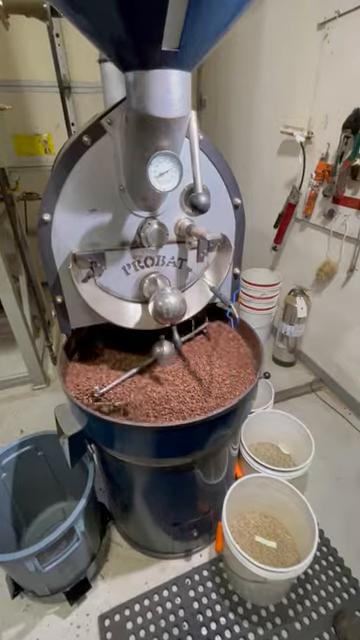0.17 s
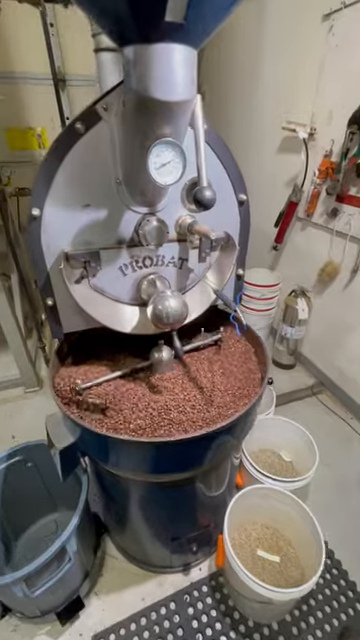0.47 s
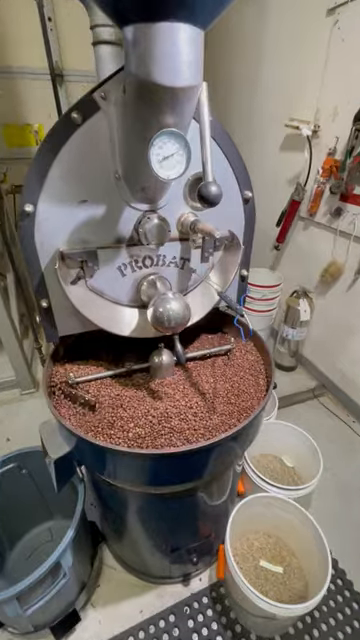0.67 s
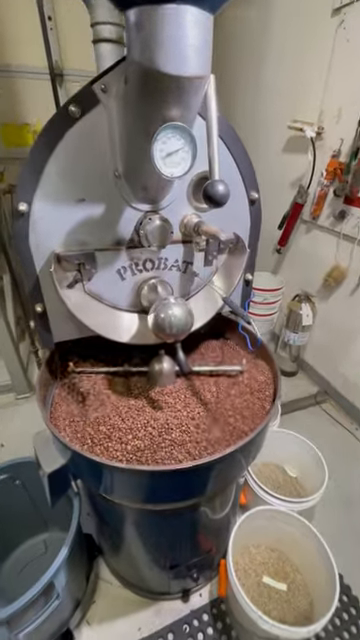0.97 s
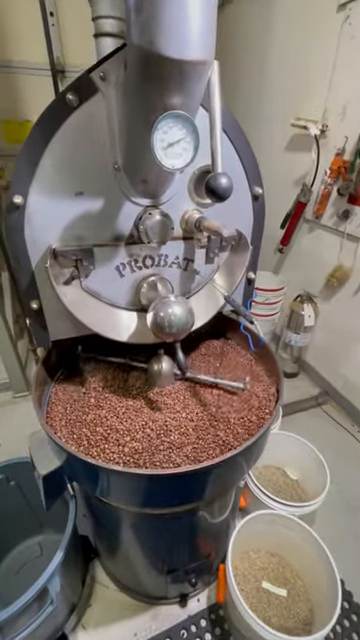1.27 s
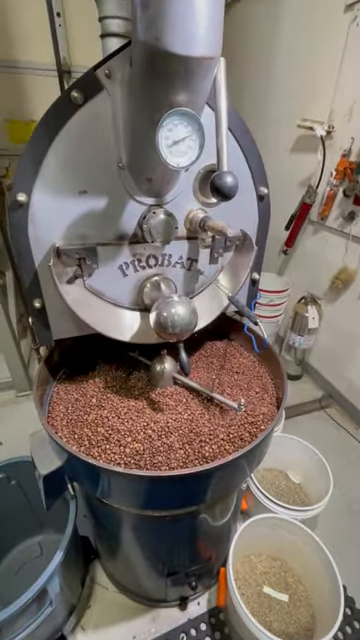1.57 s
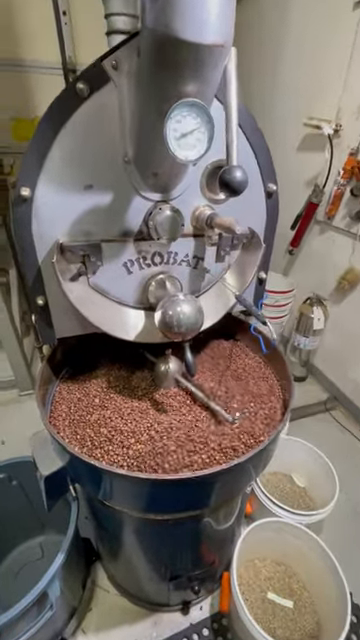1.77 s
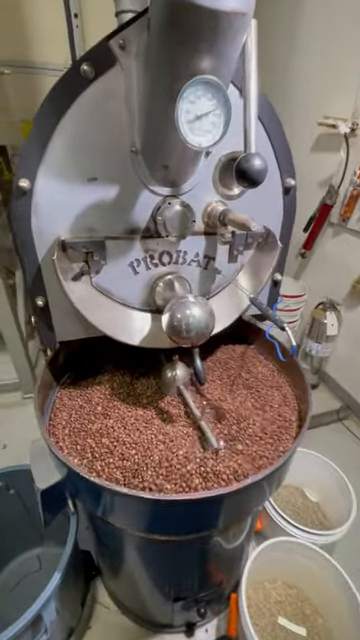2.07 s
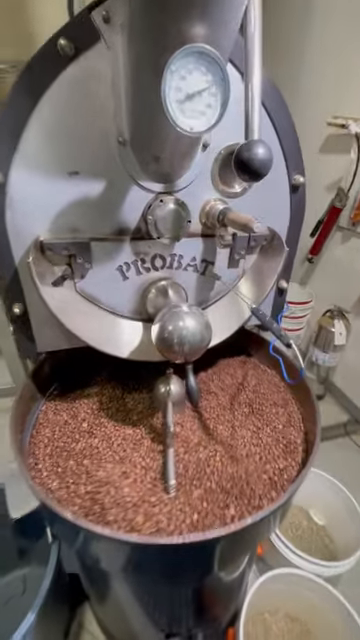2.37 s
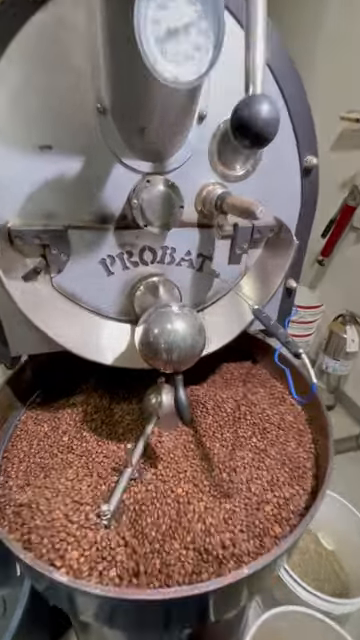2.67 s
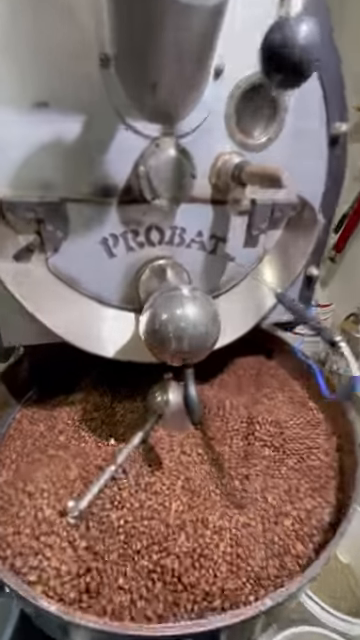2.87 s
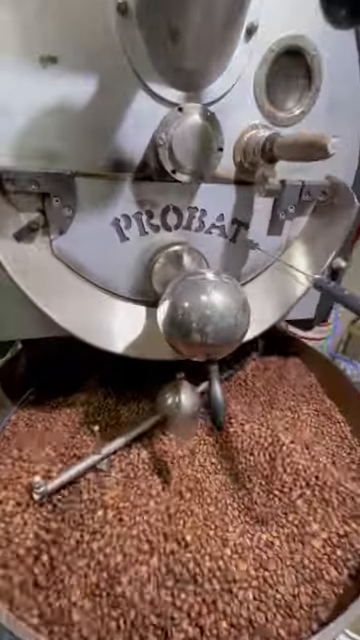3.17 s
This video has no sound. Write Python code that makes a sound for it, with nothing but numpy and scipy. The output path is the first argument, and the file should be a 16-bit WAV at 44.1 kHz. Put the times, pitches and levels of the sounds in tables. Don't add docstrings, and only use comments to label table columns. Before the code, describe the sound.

Steady low roar of a roasting machine with a faint motor whine, plus a thin, dense hiss of beans ploughed round a steel tray. It runs throughout, captured by a handheld phone in a workshop, with slightly rough treble.

```python
import sys
import numpy as np
from scipy import signal
from scipy.fft import rfft, irfft
from scipy.io import wavfile
from scipy.ndimage import uniform_filter1d

SR = 44100
rng = np.random.default_rng(int(sys.argv[2]) if len(sys.argv) > 2 else 0)


def output_pcm(signal):
    pcm = np.clip(np.atleast_2d(signal).T, -1, 1) * 32767
    wavfile.write(sys.argv[1], SR, np.round(pcm).astype(np.int16))


def volts_from_decibels(level):
    exponent = np.asarray(level, float) / 20
    return 10 ** exponent


N = 146412
SIZE = 147456
SPECTRUM_HZ = np.arange(SIZE // 2 + 1) * SR / SIZE
TIME_S = np.arange(N) / SR


def rms_one(x):
    return x / np.sqrt(np.mean(x ** 2) + 1e-20)


def back(spectra):
    return irfft(spectra, SIZE)[..., :N]


def in_time(rows):
    s, value = np.transpose(rows)
    return np.interp(TIME_S, s, value)


def at_hz(points, hz):
    p = np.array(points, float)
    return np.interp(np.log(hz + 1), np.log(p[:, 0] + 1), p[:, 1])


def drift(rate_hz):
    r = np.exp(-2 * np.pi * rate_hz * 40 / SR)
    noise = rng.standard_normal(N // 40 + 2002)
    slow = signal.lfilter([1], [1, -2 * r, r * r], noise)[2000:]
    return np.interp(np.arange(N) / 40, np.arange(len(slow)), rms_one(slow - slow.mean()))


# middle in seconds, half length in seconds, pitch in Hz, level in dB.
FLAME_SURGES = [(0.126, 0.089, 74, 6.5), (0.217, 0.16, 180, 10), (.4, 0.085, 115, 6.5),
                (.65, 0.22, 74.6, 7.5), (.62, 0.026, 108, 7.5), (.95, .12, 114, 4.5),
                (1.19, .12, 117, -8.5), (1.275, .08, 74, 6.5), (1.5, 0.11, 104, 8.5),
                (1.596, 0.039, 212, 3.5), (1.827, 0.15, 106, 4), (2.036, 0.057, 103, -15),
                (2.2, 0.24, 74.5, 0), (2.5, 0.48, 51, 6.5), (2.452, 0.25, 128, 2.5),
                (2.627, 0.027, 115, -18), (2.767, 0.057, 121, 3), (2.85, 0.076, 74, 4),
                (2.9, 0.18, 210, 5.5), (2.97, 0.088, 115, 5.5), (3.1, 0.16, 51, -12), (3.165, .07, 134, 4),
                (3.22, 0.036, 74, 6), (3.272, 0.063, 106, 7), (.04, .05, 201, -8), (0.085, .06, 834, 8),
                (0.296, 0.071, 232, -0.5), (.3, 0.082, 390, 3), (.52, 0.077, 760, 5), (.57, .05, 60, 13),
                (.6, 0.08, 150, -6), (0.878, 0.031, 111, 5), (1.152, 0.052, 360, 4.5), (1.3, 0.1, 541, -2),
                (1.352, 0.039, 135, -8), (1.694, 0.2, 820, -3), (1.9, .1, 140, -5), (1.94, 0.087, 403, 3.5),
                (2.082, .07, 560, 2), (2.21, .08, 1900, -7), (2.452, .08, 2300, 2), (2.69, 0.05, 222, 3.5),
                (2.8, .06, 303, -12), (2.946, 0.16, 950, 4), (3.05, 0.13, 1500, -5.5), (.85, .1, 3100, 3.5),
                (1.15, .06, 3500, 3), (1.294, 0.037, 3300, -7), (2.855, 0.037, 400, 4)]


def surge_db(hz, reach):
    t = np.arange(0, N + 64, 64) / SR
    total = 0
    for middle_s, half_s, surge_hz, db in FLAME_SURGES:
        total = total + db * np.exp(-(np.log(hz / surge_hz) / reach) ** 2 - ((t - middle_s) / half_s) ** 2)
    return np.interp(TIME_S, t, total)


# pitch in Hz, lead in radians.
MIC_LEAD = [(400, 0), (860, .5), (1810, .5), (2240, 1.7), (3800, 2.5), (4050, 6.7), (4900, 7.5),
            (7000, 7.4)]
# pitch in Hz, level in dB.
MIC_BALANCE = [(60, 0), (300, -.1), (550, .6), (1000, 2.2), (1400, 1.8), (2200, 2), (3000, .9), (5500, 1.4)]
# pitch in Hz, level in dB.
ROOM_DIFFUSE = [(110, -39), (250, -24), (550, -10), (1000, -5.5), (1800, -4.5), (2700, -1.8), (3700, -1.2),
                (4300, -3.4)]


def ports(direct):
    turn = volts_from_decibels(at_hz(MIC_BALANCE, SPECTRUM_HZ) / 2) * np.exp(.5j * at_hz(MIC_LEAD, SPECTRUM_HZ))
    share = volts_from_decibels(at_hz(ROOM_DIFFUSE, SPECTRUM_HZ))
    diffuse = rfft(rng.standard_normal(N), SIZE) * share * [[1], [-1]]
    both = rfft(rms_one(direct), SIZE) + diffuse
    return both * [turn, 1 / turn] / np.sqrt(1 + share ** 2)


def coloured(spectra, colour, patchy_db, shared_db):
    place = 2 * np.log2((SPECTRUM_HZ + 1) / 20)
    low_hz, high_hz = colour[0][0], colour[-1][0]
    shaped = spectra * volts_from_decibels(at_hz(colour, SPECTRUM_HZ)) * (SPECTRUM_HZ > low_hz * .5)
    out, together = 0, drift(1.9)
    for k in range(int(2 * np.log2(low_hz / 40)), int(2 * np.log2(high_hz / 20)) + 2):
        mask = np.cos(np.pi / 2 * np.clip(place - k, -1, 1)) ** 2
        flame_db = 0.51 * surge_db(20 * 2 ** (k / 2), reach=.25)
        level_db = patchy_db * drift(10.3) + shared_db * together + flame_db
        out = out + back(shaped * mask) * volts_from_decibels(level_db)
    return rms_one(out)


def ringing(modes, patchy_db, count=1, steady=0):
    out, drives = 0, [back(ports(rng.standard_normal(N))) for _ in range(2)]
    for k, (hz, width_hz, level_db) in enumerate(modes):
        r = np.exp(-np.pi * width_hz / SR)
        poles = [1, -2 * r * np.cos(2 * np.pi * hz / SR), r * r]
        rung = drives[k % 2]
        for _ in range(count):
            rung = signal.lfilter([1, 0, -1], poles, rung)
        power = uniform_filter1d(rms_one(rung)[0] ** 2, size=int(SR / hz)) + 0.089
        evened = rms_one(rung / power ** (steady / 2))
        swell_db = surge_db(hz, reach=.1) + patchy_db * drift(1.9)
        out = out + volts_from_decibels(level_db + swell_db) * evened
    return out


# time in seconds, level in dB.
ROAR_LEVEL = [(0.05, -12), (0.07, -16), (0.76, -17.5), (1.07, -15.5), (1.1, -16.5), (1.54, -17),
              (1.65, -18.5), (1.9, -15), (1.92, -17), (2.68, -17.5), (2.79, -14), (2.81, -16), (3.29, -15),
              (3.31, -15.5)]
# time in seconds, level in dB.
COOLING_DRAUGHT = [(0.05, -32), (0.34, -30.5), (0.35, -32), (0.39, -30.5), (0.66, -32), (2.4, -30),
                   (2.42, -32.5), (2.87, -31), (2.88, -31), (3.25, -32.5), (3.27, -36.5), (3.31, -30.5)]
# pitch in Hz, level in dB per Hz.
AIR_COLOUR = [(42, -23), (62, -11.5), (130, -5), (380, -11), (490, -18.5), (780, -18), (1100, -23.5),
              (2300, -28.5)]
# pitch in Hz, width in Hz, level in dB.
DUCT_MODES = [(51.4, 6.3, -9.5), (73.3, 9.2, -4), (106.4, 12.8, -0.5), (124.7, 14.5, -0.5), (134, 18.7, -9),
              (180, 9.8, -6.5), (210, 22.7, -7), (257.3, 37, -9.5), (320.4, 36, -9.5), (358.8, 15.4, -9),
              (406.3, 42, -12.5)]


def roar():
    level_db, draught_db = in_time(ROAR_LEVEL), in_time(COOLING_DRAUGHT)
    last_hz, last_db = AIR_COLOUR[-1]
    falling = list(AIR_COLOUR) + [(last_hz * 2, last_db - 7)]
    air = coloured(ports(rng.standard_normal(N)), falling, patchy_db=1.0, shared_db=0.22)
    air_swing_db = 0.58 * (draught_db - draught_db.mean())
    ducts = rms_one(ringing(DUCT_MODES, patchy_db=-0.5, count=2, steady=0.72))
    return volts_from_decibels(level_db.mean() + air_swing_db - 5.5) * air + volts_from_decibels(level_db - 1.5) * ducts


# pitch in Hz, width in Hz, level in dB.
CASING_MODES = [(468, 8, -46), (541, 8, -44), (660, 12, -46), (775, 14, -46), (834, 14, -48),
                (942, 12, -49), (1155, 10, -53), (1254, 8, -52), (1356, 8, -55), (1670, 8, -57),
                (2284, 8, -57), (2850, 7, -58)]


def casing():
    return volts_from_decibels(1.5) * ringing(CASING_MODES, patchy_db=2.5, steady=0.25)


# time in seconds, rustle level in dB.
STIR_EFFORT = [(0.05, -33), (0.06, -34.5), (0.15, -36), (0.82, -34.5), (0.84, -36), (2.3, -36.5),
               (3.31, -34)]
# pitch in Hz, level in dB per Hz.
BEAN_COLOUR = [(1880, -9), (3200, -5), (3950, -7), (5950, 0), (7960, -2), (9510, -1.5), (13000, -8),
               (14100, -6.5), (15500, -11)]
# pitch in Hz, width in Hz, level in dB.
TRAY_MODES = [(4864, 8, -25), (5226, 9, -22), (5292, 9, -22), (5315, 8, -21), (5652, 9, -22),
              (5840, 9, -22), (6056, 6, -19), (6164, 10, -21), (6687, 8, -23), (7011, 9, -24)]


def beans():
    hits_per_s = 5000 * volts_from_decibels(2.5 * drift(15.0))
    sizes = volts_from_decibels(2.5 * np.minimum(rng.exponential(1, N), 5)) * rng.choice([-1, 1], N)
    hits = sizes * (rng.random(N) < hits_per_s / SR)
    hiss = volts_from_decibels(-1) * rng.standard_normal(N)
    first_hz, first_db = BEAN_COLOUR[0]
    rising = [(first_hz * 0.57, first_db - 18)] + list(BEAN_COLOUR)
    rustle = coloured(ports(rms_one(hits) + hiss), rising, patchy_db=0.7, shared_db=0.53)
    tray = volts_from_decibels(2.0) * ringing(TRAY_MODES, patchy_db=0.0)
    return volts_from_decibels(in_time(STIR_EFFORT) + 1.5) * (rustle + tray)


# start in seconds, peak level in dB, pitch in Hz.
BEAN_FLICKS = [
    (.803, -45, 3420),
    (.810, -31, 3450),
    (.810, -34, 3100),
    (.812, -36, 2550),
    (.817, -43, 3000),
]


def flicks():
    out = 0
    for start_s, peak_db, hz in BEAN_FLICKS:
        age = np.maximum(TIME_S - start_s, 0)
        out = out + volts_from_decibels(peak_db - 60 * age / 0.029) * np.sin(2 * np.pi * hz * age)
    return out


def scene():
    return roar() + casing() + beans() + flicks()


PUFF_RANGE = (10350, 13050)
WHOLE_MOMENTS = [.878, 1.235]
# lowest pitch in Hz, highest pitch in Hz, share of time dropped, share of time wide.
PATCHY_BANDS = [(6900, 7600, 0, .07), (7600, 8300, 0, .025), (8300, 9000, 0, .015), (8800, 8950, .06, 0),
                (9150, 9300, .08, 0), (9500, 9650, .1, 0), (9750, 9950, .2, 0), (9950, 10130, .6, 0),
                (10130, 10330, .8, 0), (10350, 11000, .17, .11), (11000, 11700, .17, .14),
                (11700, 12400, .18, .15), (12400, 13050, .36, .16), (13100, 13300, .78, 0),
                (13300, 13500, .7, 0), (13500, 13700, .3, 0), (13700, 14500, .02, .02),
                (13900, 14050, .08, 0), (14500, 15300, 0, .03), (14900, 15050, .08, 0),
                (15300, 15750, .03, .03)]


def puffs(x):
    frame_len, puff_s = 1024, .001
    mid = rfft(x[0] + x[1], SIZE) / 2 * (SPECTRUM_HZ < 15750)
    side = rfft(x[0] - x[1], SIZE) / 2 * (SPECTRUM_HZ < 6890)

    frames = np.arange(N) / frame_len
    frame, count = frames.astype(int), N // frame_len + 2
    burst = np.exp(-.5 * ((frames % 1 - .5) * frame_len / SR / puff_s) ** 2)
    puff_db = 9 + 1.5 * rng.standard_normal(count)
    puff = volts_from_decibels(-10) + volts_from_decibels(puff_db)[frame] * burst
    whole = np.any([np.abs(TIME_S - s) < .025 for s in WHOLE_MOMENTS], axis=0)
    puff[whole] = 1
    in_range = (SPECTRUM_HZ > PUFF_RANGE[0]) * (SPECTRUM_HZ < PUFF_RANGE[1])
    puffed = mid + rfft(back(mid * in_range) * (puff - 1), SIZE)

    mid_out, side_out = back(puffed), back(side)
    for low_hz, high_hz, dropped, wide in PATCHY_BANDS:
        in_band = (SPECTRUM_HZ >= low_hz) & (SPECTRUM_HZ < high_hz)
        band, plain = back(np.array([puffed, mid]) * in_band)
        hold = 1 if wide else 2
        chance = rng.random(count)[np.arange(count) // hold]
        growth = .8 * wide / (dropped + wide) * np.linspace(-1, 1, count)
        chance = (chance / (1 + growth))[frame]
        gone = uniform_filter1d((chance < dropped) * 1. * ~whole, size=384)
        mid_out -= band * gone * (1 - volts_from_decibels(-35))
        side_out += plain * uniform_filter1d((chance < wide) * 1., size=frame_len) * volts_from_decibels(1.5)
    return np.array([mid_out + side_out, mid_out - side_out])


def band_limit(x):
    return signal.sosfilt(signal.butter(12, 15960, fs=SR, output="sos"), x)


def record(dry):
    start_s = .0362
    mix = puffs(dry) * (np.arange(N) >= start_s * SR)
    return band_limit(mix)


dry = scene()
out = record(dry)
output_pcm(out)
```